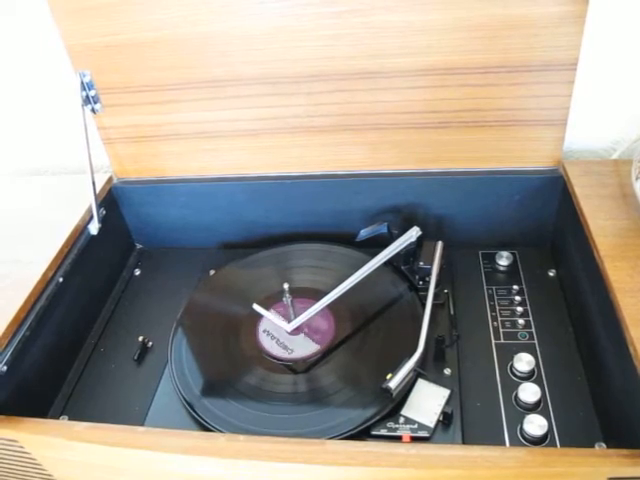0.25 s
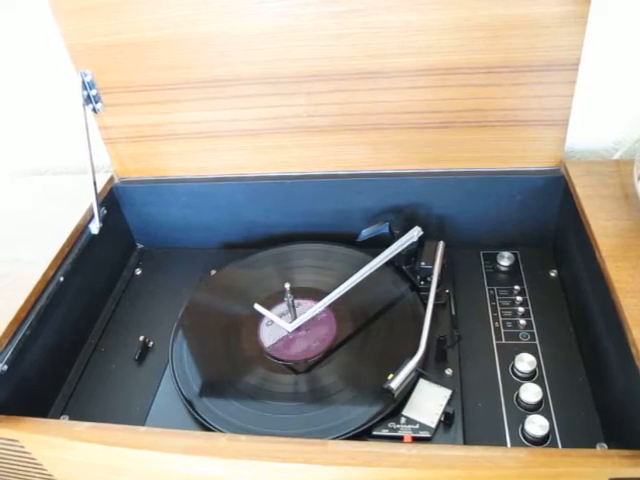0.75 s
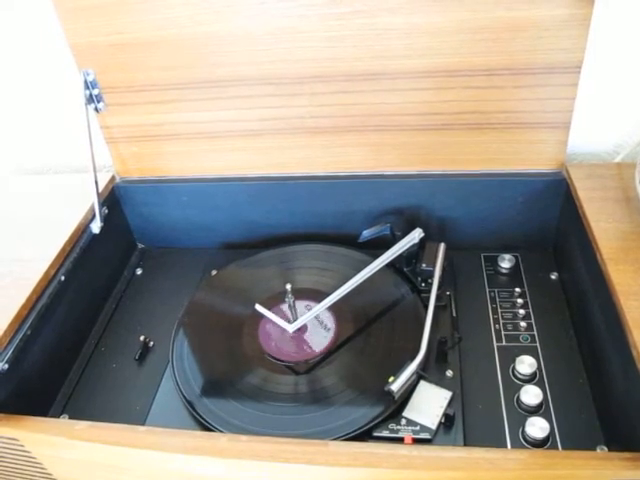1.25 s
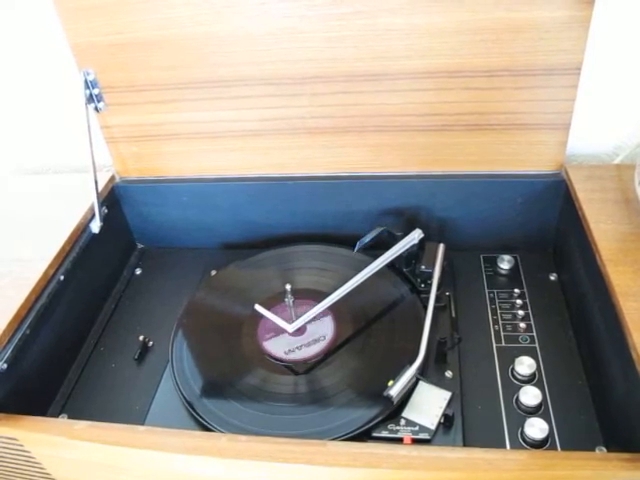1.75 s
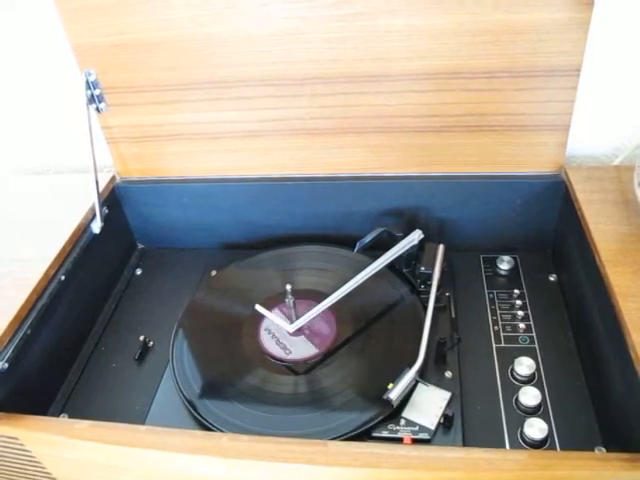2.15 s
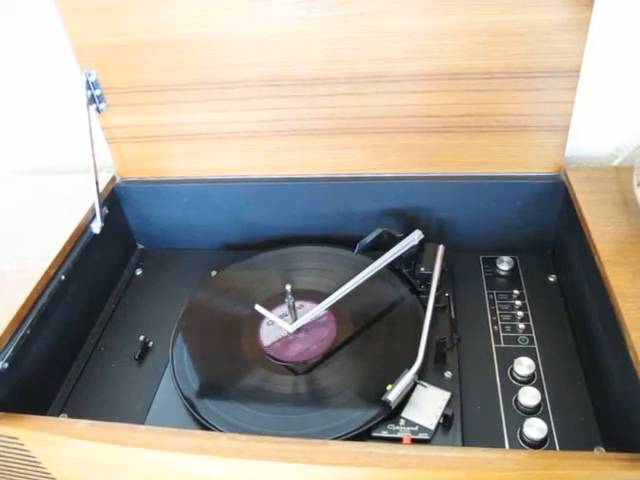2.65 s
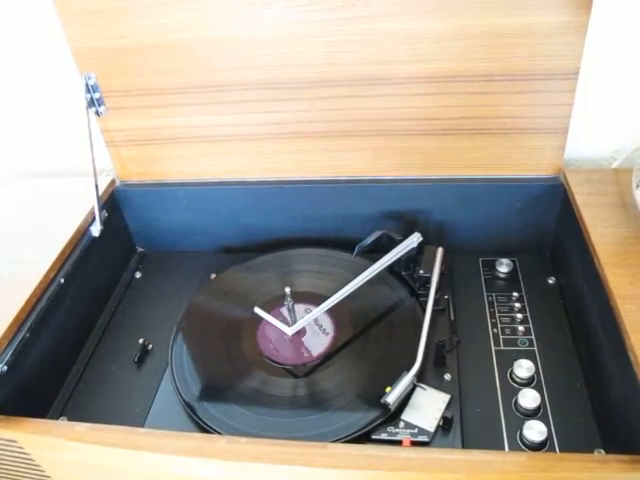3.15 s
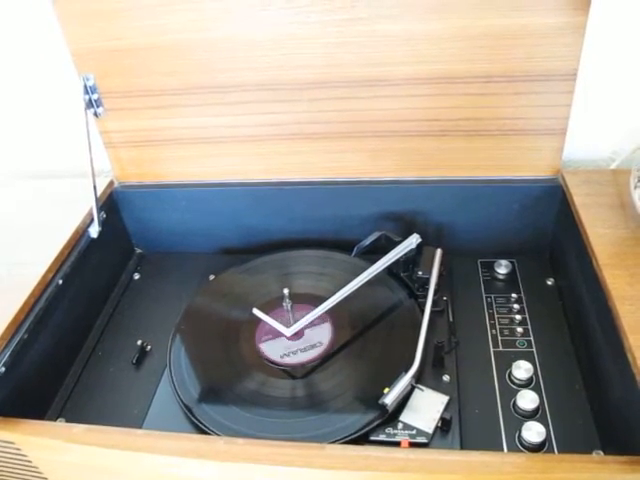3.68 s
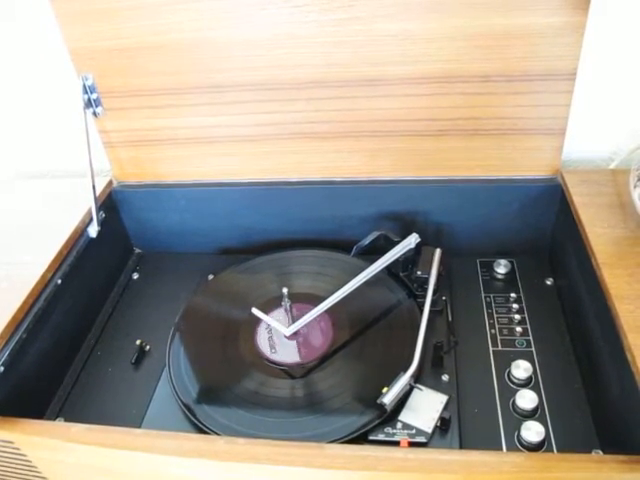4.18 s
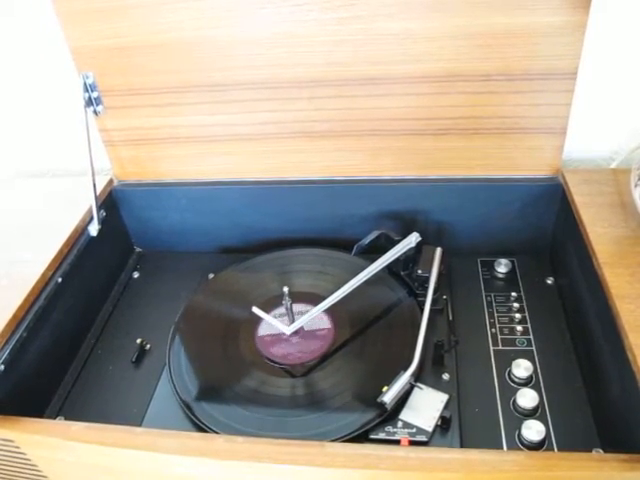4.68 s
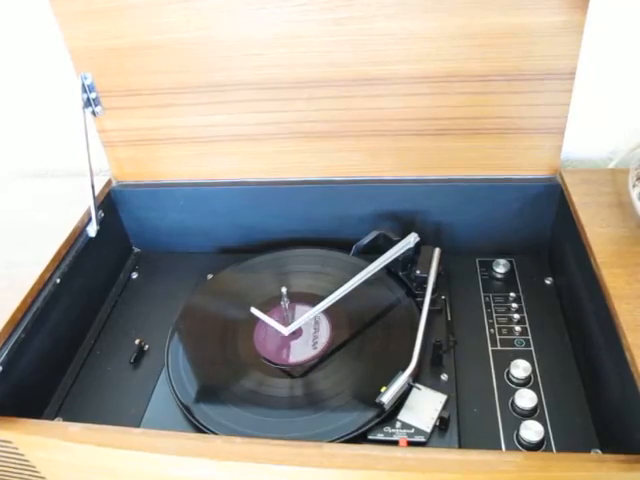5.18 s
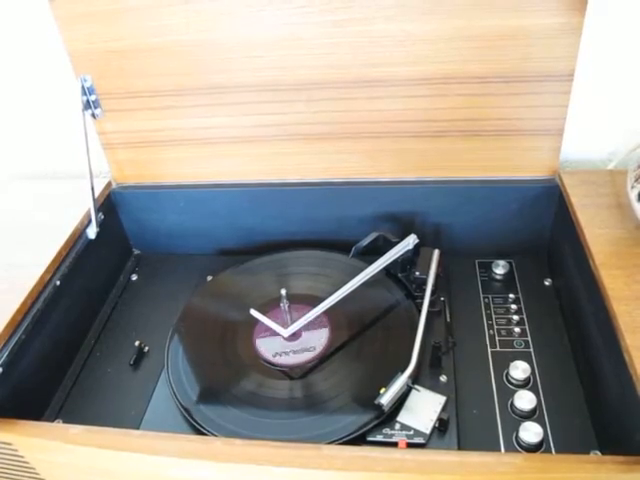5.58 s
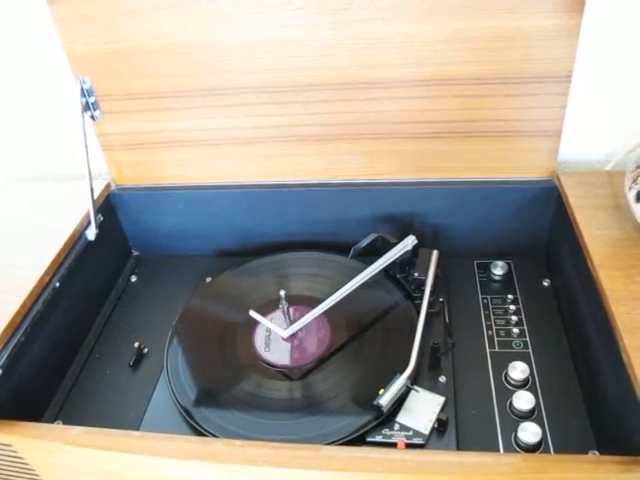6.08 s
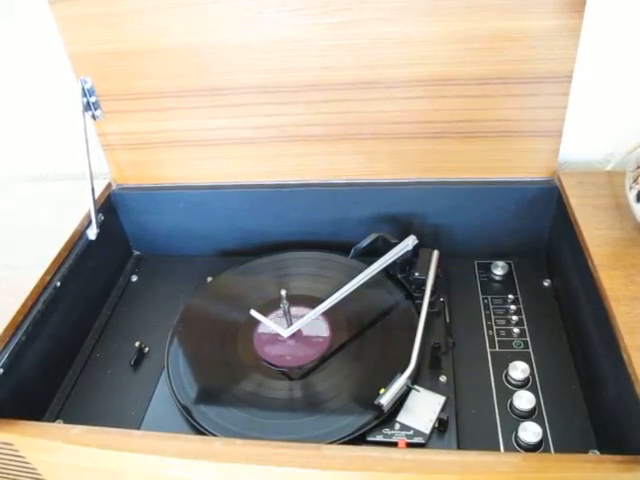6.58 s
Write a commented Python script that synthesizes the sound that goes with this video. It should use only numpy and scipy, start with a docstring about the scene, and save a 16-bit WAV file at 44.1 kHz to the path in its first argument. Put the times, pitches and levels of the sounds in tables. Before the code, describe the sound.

A record deck in a wooden cabinet hums and hisses, then a sharp steel latch snap, followed by dull lever thunks, clacks and soft tapping.

```python
"""Autochanger deck running its cycle

A deck works inside a wooden cabinet in a quiet room, over steady mains hum, motor rumble and hiss.
The cam follower taps, levers drop on the chassis and the cam gear grumbles: all ring the cabinet modes.
Two faint pitched ticks are short sines. A steel latch snaps and bounces and levers clack:
bursts of filtered noise with ringing latch modes. A diffuse room tail follows these sounds,
and the recorder's gain control ducks after loud snaps and creeps back."""
import sys
import numpy as np
from scipy import signal
from scipy.fft import rfft, irfft
from scipy.io import wavfile
from scipy.ndimage import uniform_filter1d

SR = 44100
rng = np.random.default_rng(int(sys.argv[2]) if len(sys.argv) > 2 else 0)


def field_ratio(decibels):
    """Amplitude ratio for a level in dB (20 dB per decade); scalars and array-likes work."""
    return 10 ** (np.asarray(decibels, dtype=float) / 20)


def master(y):
    """Save y as 16-bit WAV."""
    cut = np.clip(np.atleast_2d(y).T, -1, 1)
    pcm = np.round(cut * 32767)  # scale
    wavfile.write(sys.argv[1], SR, pcm.astype(np.int16))


N = 301203   # length in samples

# mains harmonics: f/Hz, rms level/dB
HUM_HARMONICS = [(100, -67), (150, -55.5), (200, -66.5), (250, -68.5), (300, -77), (350, -75.5)]
# spectrum shape of the hiss and deep room rumble: f/Hz, relative level/dB
HISS_SPECTRUM = [(10, 1.5), (30, -8), (70, -15), (110, -22.5), (180, -23), (280, -30.5), (600, -34.5),
                 (1100, -35), (1600, -41), (2470, -45), (5000, -47), (9130, -52), (13000, -57),
                 (16000, -60.5)]
# low shudders of the sprung deck: t/s of the top, level/dB
DECK_SHUDDERS = [(0.02, -37.5), (.91, -39), (2.43, -43), (3.14, -45), (3.69, -40.5), (4.32, -32),
                 (6.13, -38)]
# wooden cabinet modes: f/Hz, relative level/dB, t60/s
CABINET_MODES = [(74.4, -2, 0.3), (87.67, -3.5, 0.32), (124, -8.5, 0.13), (218.2, 1, 0.44),
                 (287.9, -8.5, 0.4), (359.3, -1.5, 0.15), (379.2, 0, 0.115), (416.6, -3, 0.143),
                 (460, -8, 0.134), (518, -11.5, 0.1), (592.7, 1.5, 0.12), (614, 0.5, 0.095),
                 (731.6, -6, 0.075), (816, -7, 0.067), (847, -8.5, 0.076), (1000, -9, 0.054),
                 (1081, -4, 0.082), (1178, -8.5, 0.106), (1273, -11.5, 0.04), (1480, -12, 0.055),
                 (1634, -9, 0.06)]
# grumble of the turning cam gear: t/s, relative level/dB
CAM_GRUMBLE = [(2.25, -70), (2.4, -61.5), (3.0, -51.5), (3.5, -59), (4.5, -56.5), (4.7, -66.5), (5.9, -62),
               (6.15, -57.5), (6.5, -65.5)]
# cam follower taps: t/s, relative level/dB of the upper modes
FOLLOWER_TAPS = [(.127, -44.5), (2.656, -38), (2.726, -38), (2.801, -45), (2.877, -37), (2.971, -45),
                 (3.014, -37), (3.348, -39.5), (3.617, -41), (3.767, -43), (3.796, -34.5), (3.839, -33.5),
                 (4.042, -51), (4.121, -37), (4.215, -37.5), (4.506, -26), (4.53, -35), (4.957, -36.5),
                 (4.98, -45.5), (5.413, -48.5), (5.543, -42), (5.606, -53), (5.7, -51.5), (6.048, -35),
                 (6.075, -45.5), (6.148, -46.5), (6.385, -46.5), (6.656, -42.5)]
# heavy levers dropping on the chassis: t/s, then relative level/dB of
# upper modes, panel modes, baseboard, boom
LEVER_DROPS = [(2.336, -35.5, -36.5, -49.5, -32.5), (2.409, -24.5, -31, -34, -21.5),
               (2.461, -28.5, -31, -43, -25), (2.515, -27, -38.5, -55, -32), (2.587, -32.5, -44, -57, -40),
               (3.048, -33.5, -32.5, -41, -42), (3.061, -22.5, -23.5, -27.5, -35),
               (4.259, -22.5, -23.5, -37, -49), (4.271, -20.5, -18.5, -24, -43),
               (4.348, -25.5, -30, -41, -33)]
# faint pitched ticks: t/s, f/Hz, level/dB
PITCHED_TICKS = [(.238, 2010, -48), (.945, 2900, -54)]
# steel latch modes: f/Hz, relative level/dB, t60/s
LATCH_MODES = [(2150, -13, 0.046), (2915, -10.5, 0.032), (3495, -9.5, .03), (4596, 0.5, 0.034),
               (4670, 2.5, 0.031), (4770, -19, 0.31), (4850, -14, 0.22), (4860, -2, .03), (5960, -1, .03),
               (7650, -4.5, .03), (8270, -7.5, .03), (9600, -4.5, 0.017), (10200, -7, 0.034),
               (9700, -19, 0.31), (2900, -25.5, .2), (4550, -19.5, 0.18), (11000, -8.5, 0.019),
               (11400, -5, 0.019), (14090, -5.5, 0.0041)]
# the latch touches its stop, chatters and bounces: t/s, crack level/dB, ring level/dB
LATCH_CONTACTS = [(1.6377, -56.5, -54), (1.652, -23, -23.5), (1.654, -7, -17.5), (1.657, -4.5, -21.5),
                  (1.6619, -17, -16.5), (1.698, -12, -24.5), (1.724, -16.5, -36), (1.75, -30, -29.5),
                  (2.4579, -28, -39.5), (2.4603, -18.5, -28), (2.487, -35, -45)]
# levers clack and tick: t/s, bright crack level/dB, dull crack level/dB
LEVER_CLACKS = [(2.424, -56, -48), (2.7251, -60, -57), (2.742, -55, -50), (2.8742, -61, -45.5),
                (3.0486, -19.5, -26), (3.061, -39, -44), (3.623, -59, -61), (3.84, -65, -51.5),
                (4.1198, -72, -51.5), (4.215, -60, -47), (4.2373, -42, -46.5), (4.258, -28.5, -28.5),
                (4.264, -25.5, -33), (4.5078, -54, -45.5), (4.531, -60, -50), (4.9557, -55, -51),
                (4.981, -65, -56), (6.083, -71, -59), (6.1732, -56, -62)]
# decay of the room tail: f/Hz, t60/s
ROOM_DECAY = [(250, 0.33), (1000, 0.56), (4000, 0.35), (12000, 0.26)]

MAINS_HZ = 50
HISS_DB = -59.5   # rms between 300 and 16000 Hz
RUMBLE_DB, SHUDDER_RISE_S, SHUDDER_FALL_S = -42, 0.035, 0.075
BOOM_BELOW_HZ, BOARD_BELOW_HZ, PANELS_BELOW_HZ = 150, 300, 550   # edges of the cabinet mode groups
CONTACT_HZ = 1532   # top cut of the soft knocks
TAP_PANEL_DB, TAP_BOARD_DB, TAP_BOOM_DB = -12.5, -20.5, -14.5   # against the upper modes
TICK_T60_S = 0.035
LATCH_DULL_DB = -9   # dull crack against bright
CHATTER_T60_MS, BOUNCE_T60_MS = 9.1, 31   # hard touches are short
CHATTER_ABOVE_DB = -28   # ring level that marks a hard touch
CLACK_T60_MS, LONGER_MS_PER_DB = 83, 0.8657   # at 0 dB of dull crack; weaker clacks die sooner
SHAKE_DB, SHAKE_FOLLOWS = -40, 0.42   # ring dB = SHAKE_DB + SHAKE_FOLLOWS * bright dB
LEVER_TOP_HZ = 11300   # lever clacks are darker than the latch


def band(x, low_hz, high_hz):
    """Butterworth band-pass."""
    return signal.sosfilt(signal.butter(2, [low_hz, high_hz], "band", fs=SR, output="sos"), x)


def low_pass(x, hz, order=2):
    """Butterworth top cut."""
    return signal.sosfilt(signal.butter(order, hz, fs=SR, output="sos"), x)


def rms_one(x):
    """Scale to rms 1."""
    return x / np.sqrt(np.mean(x ** 2) + 1e-20)


def steep_noise(low_hz, high_hz):
    """Noise band-passed twice, at rms 1."""
    noise = rng.standard_normal(N)
    return rms_one(band(band(noise, low_hz, high_hz), low_hz, high_hz))


def in_time(rows):
    """A level curve in dB as gain per sample, nearly silent (-120 dB) before its first row."""
    s, db = np.transpose(rows)
    return field_ratio(np.interp(np.arange(N) / SR, s, db, left=-120))


def at_hz(points, hz):
    """Read a table on a log-frequency axis."""
    table_hz, values = np.transpose(points)
    return np.interp(np.log(hz), np.log(table_hz), values)


def ring(push, hz, t60):
    """A struck mode: a unit click sets a dying sine of height 1 ringing."""
    r = field_ratio(-60 / (t60 * SR))
    w = 2 * np.pi * hz / SR
    return signal.lfilter([0, np.sin(w)], [1, -2 * r * np.cos(w), r * r], push + 1e-18)


def rumble_level():
    """Steady motor rumble plus low shudders of the sprung deck that rise and fall exponentially."""
    t = np.arange(N) / SR
    level = field_ratio(RUMBLE_DB)
    for s, db in DECK_SHUDDERS:
        level = level + field_ratio(db) * np.exp(np.minimum((t - s) / SHUDDER_RISE_S, (s - t) / SHUDDER_FALL_S))
    return level


def background():
    """Mains harmonics, motor rumble and deck shudders around the mains pitch, and smooth hiss over a deep room
    rumble."""
    t = np.arange(N) / SR
    hum = 0
    for hz, db in HUM_HARMONICS:
        hum = hum + np.sqrt(2) * field_ratio(db) * np.sin(2 * np.pi * (hz * t + rng.random()))
    mains = np.sqrt(2) * np.sin(2 * np.pi * MAINS_HZ * t)
    rough = steep_noise(36, 58)
    rumble = rumble_level() * (field_ratio(-5.5) * mains + field_ratio(-1.5) * rough)
    hz = np.maximum(np.fft.rfftfreq(N, 1 / SR), 1)
    shape = field_ratio(at_hz(HISS_SPECTRUM, hz)) * hz / (hz + 4)   # the last factor thins the lowest few Hz
    hiss = irfft(rfft(rng.standard_normal(N)) * shape, N)
    hiss /= np.std(band(hiss, 300, 16000))
    return hum + rumble + field_ratio(HISS_DB) * hiss


def knock_rows():
    """Drops, and taps that all share one colour, with the columns of LEVER_DROPS."""
    taps = [(s, db, db + TAP_PANEL_DB, db + TAP_BOARD_DB, db + TAP_BOOM_DB) for s, db in FOLLOWER_TAPS]
    return np.array(LEVER_DROPS + taps)


def cam_teeth():
    """The cam gear grinds as uneven tooth contacts, 120 a second on average."""
    contacts = rng.random(N) < 120.0 / SR
    strength_db = 5.5 * np.minimum(rng.exponential(1, N), 4)
    return rms_one(contacts * field_ratio(strength_db)) * in_time(CAM_GRUMBLE)


def cabinet():
    """Knocks and the grinding cam drive the same cabinet modes; each knock adds a short scuff of noise."""
    rows = knock_rows()
    at = np.round(rows[:, 0] * SR).astype(int)
    luck = rng.standard_normal((len(rows), len(CABINET_MODES)))
    teeth = cam_teeth()
    blows = np.zeros(N)
    blows[at] = field_ratio(rows[:, 1] - 11.5)
    scuff = signal.lfilter([1], [1, -field_ratio(-60 / (.07 * SR))], blows)   # t60 70 ms
    out = scuff * rms_one(band(rng.standard_normal(N), 450, 1620))
    for k, (hz, level_db, t60) in enumerate(CABINET_MODES):
        # 0 boom, 1 baseboard, 2 panels, 3 upper modes
        group = np.searchsorted([BOOM_BELOW_HZ, BOARD_BELOW_HZ, PANELS_BELOW_HZ], hz)
        knock_db = rows[:, 4 - group] + [2.5, 0.0, -2.5, -12.5][group]   # share of each mode in its group
        grind_db = level_db + [-27.5, -41.5, -29.0, -30.5][group]
        push = field_ratio(grind_db) * teeth * rng.choice([-1, 1], N)
        # every knock strikes each mode a little differently, with a random sign
        push[at] += field_ratio(knock_db + level_db + 1.74 * luck[:, k]) * np.sign(luck[:, k - 1])
        out += ring(push, hz, t60)
    return low_pass(out, CONTACT_HZ)   # soft contacts are dull


def pings():
    """Each faint tick rings briefly at one pitch."""
    out = np.zeros(N)
    for s, hz, db in PITCHED_TICKS:
        click = np.arange(N) == round(s * SR)
        out += ring(field_ratio(db) * click, hz, TICK_T60_S)
    return out


def snap_rows():
    """Latch touches, then lever clacks that shake the latch: t/s, bright/dB, dull/dB, t60/ms, ring/dB."""
    rows = []
    for s, db, ring_db in LATCH_CONTACTS:
        t60_ms = CHATTER_T60_MS if ring_db > CHATTER_ABOVE_DB else BOUNCE_T60_MS
        rows.append((s, db, db + LATCH_DULL_DB, t60_ms, ring_db))
    for s, db, dull_db in LEVER_CLACKS:
        t60_ms = max(CLACK_T60_MS + LONGER_MS_PER_DB * dull_db, 8)
        rows.append((s, db, dull_db, t60_ms, SHAKE_DB + SHAKE_FOLLOWS * db))
    return np.array(rows)


def cracks(rows):
    """Each contact is a dying burst of bright and dull noise; lever bursts are darker on top."""
    latch, lever, dull = np.zeros((3, N))   # envelopes
    t = np.arange(SR // 5) / SR
    for k, (s, bright_db, dull_db, t60_ms, _) in enumerate(rows):
        at = round(s * SR)
        shape = (1 - np.exp(-t / .0004)) * field_ratio(-60000 * t / t60_ms)
        bright = latch if k < len(LATCH_CONTACTS) else lever
        bright[at:at + len(t)] += field_ratio(bright_db) * shape
        dull[at:at + len(t)] += field_ratio(dull_db) * shape
    crack = low_pass(steep_noise(3400, 11800), 13000, order=4)
    darker = low_pass(crack, LEVER_TOP_HZ)
    return latch * crack + lever * darker + dull * steep_noise(1240, 3500)


def snaps():
    """Each snap is a crack of noise and one strike on the latch modes, uneven from mode to mode."""
    rows = snap_rows()
    out = cracks(rows)
    at = np.round(rows[:, 0] * SR).astype(int)
    luck = rng.standard_normal((len(rows), len(LATCH_MODES)))
    for k, (hz, level_db, t60) in enumerate(LATCH_MODES):
        clicks = np.zeros(N)
        clicks[at] = field_ratio(rows[:, 4] + level_db + 1.1 * luck[:, k]) * np.sign(luck[:, k - 1])
        out += ring(clicks, hz, t60)
    return out


def room(x):
    """Diffuse tail: bands of noise, each dying at its own rate after a short build-up."""
    t = np.arange(SR // 2 + SR // 4) / SR
    tail = 0
    for hz in 125 * 2. ** np.arange(7):   # octaves
        noise = band(rng.standard_normal(len(t)), hz / np.sqrt(2), hz * np.sqrt(2))
        tail = tail + noise * field_ratio(-60 * t / at_hz(ROOM_DECAY, hz))
    air = band(rng.standard_normal(len(t)), 11300, 18000)
    tail = tail + field_ratio(1.0) * air * field_ratio(-60 * t / ROOM_DECAY[-1][1])
    tail = tail * (1 - np.exp(-t / 0.002))
    return signal.fftconvolve(x, tail / np.sqrt(np.sum(tail ** 2)))[:N]


def scene():
    """The deck in its room over the steady background."""
    wood = cabinet()
    steel = pings() + snaps()
    tail = room(field_ratio(-6.5) * steel + field_ratio(-5.5) * wood)
    return (steel + wood + tail + background())[None]


def gain_control(x, threshold_db, slope, release_db_s, lag_s):
    """Loud moments pull the gain down with a short lag; it creeps back at a fixed rate."""
    t = np.arange(N) / SR
    level_db = 10 * np.log10(uniform_filter1d(x ** 2, size=SR // 100) + 1e-12)   # over 10 ms
    cut_db = slope * np.maximum(level_db - threshold_db, 0)
    # hold the deepest cut so far, let go at release_db_s
    held_db = np.maximum.accumulate(cut_db + release_db_s * t) - release_db_s * t
    held_db = np.maximum(held_db, 0)
    r = np.exp(-1 / (lag_s * SR))
    return x * field_ratio(-signal.lfilter([1 - r], [1, -r], held_db))


def top_cut(x):
    """Nothing passes above the cut-off."""
    return signal.sosfilt(signal.butter(12, 16510, fs=SR, output="sos"), x)


def record(dry):
    """Gain control, then a steep top cut, 50 dB down from 16500 Hz."""
    x = gain_control(dry[0], threshold_db=-22, slope=0.99, release_db_s=10.0, lag_s=0.042)
    mix = signal.sosfilt(signal.cheby2(10, 50, 16500, fs=SR, output="sos"), x)
    return top_cut(mix[None])


dry = scene()
out = record(dry)
master(out)
```